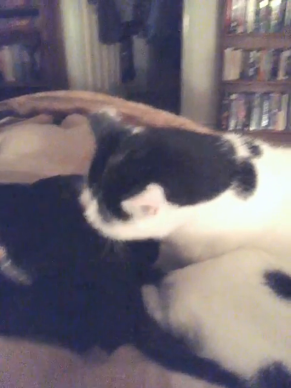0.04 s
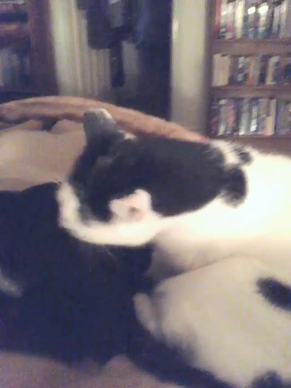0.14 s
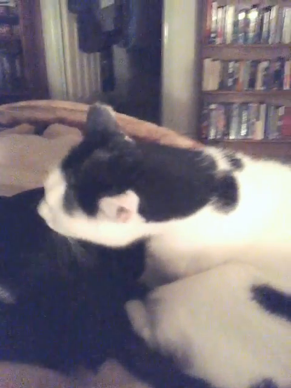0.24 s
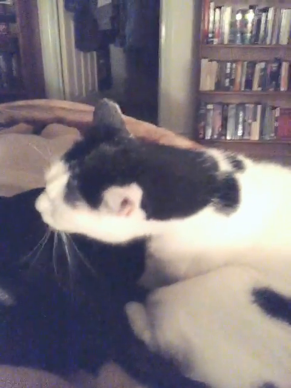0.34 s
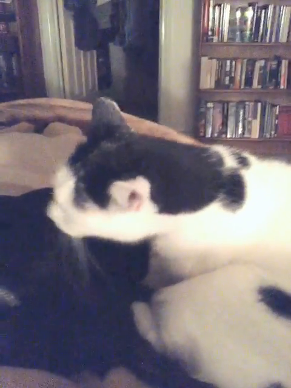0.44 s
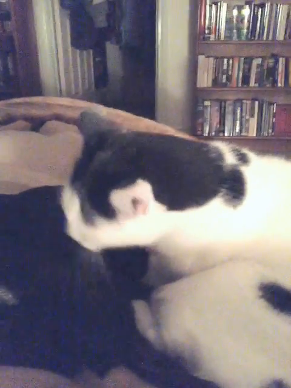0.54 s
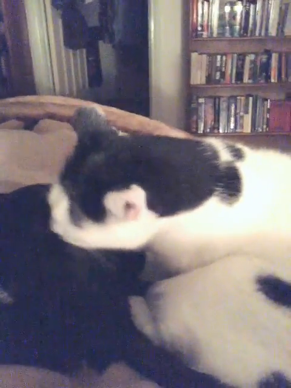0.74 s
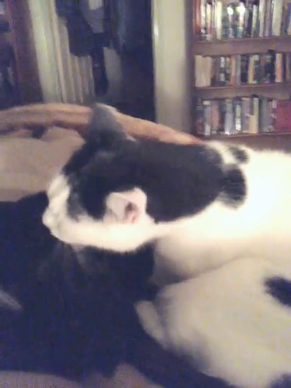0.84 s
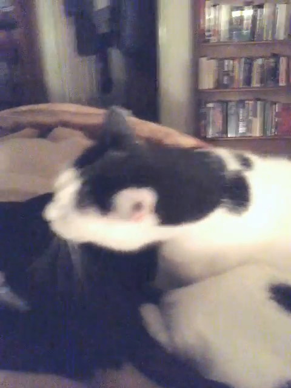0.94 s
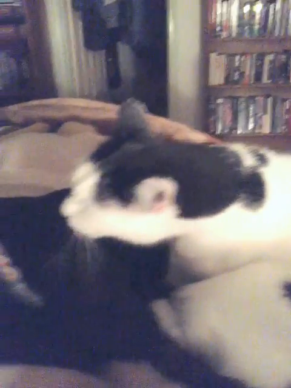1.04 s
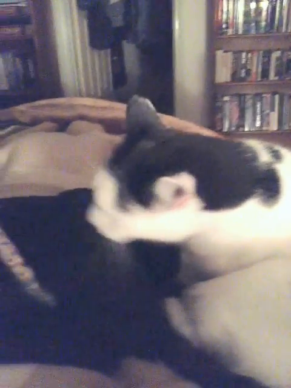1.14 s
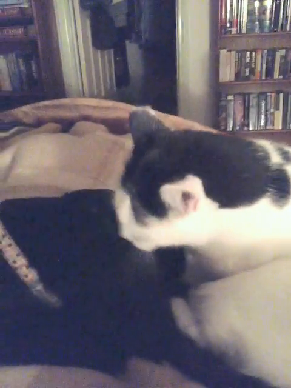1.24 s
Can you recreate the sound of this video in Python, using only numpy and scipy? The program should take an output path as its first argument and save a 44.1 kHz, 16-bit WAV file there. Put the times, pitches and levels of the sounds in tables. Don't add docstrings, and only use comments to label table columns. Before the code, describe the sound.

Handling noise on a hand-held phone, close and dry, in a quiet room with a cat on a couch. Soft dull bumps at 0-0.07 and 0.17-0.2 seconds; sharp clicks at 0.23 and, loudest, 0.37; a click and heavy juddering knock around 0.44; clicks at 0.49 and 0.56. Muffled bumps and faint ticks follow from 0.68, with strong thuds near 1.2. Low rumble and faint hiss throughout.

```python
import sys
import numpy as np
from scipy import signal
from scipy.fft import rfft, irfft
from scipy.io import wavfile
from scipy.ndimage import uniform_filter1d

SR = 44100
rng = np.random.default_rng(int(sys.argv[2]) if len(sys.argv) > 2 else 0)


def master(y):
    cut = np.clip(np.atleast_2d(y).T, -1, 1)
    pcm = np.round(cut * 32767)
    wavfile.write(sys.argv[1], SR, pcm.astype(np.int16))


def invert_db(level):
    return 10 ** (np.asarray(level, dtype=float) / 20)


N = 57330

# start in seconds, step level in dB, direction (+1 or -1), rise time in ms.
SHOVE_STEPS = [(.012, -46, 1, .9), (.0334, -32.4, -1, 1.9), (.05, -46, 1, .7), (.0652, -31, 1, 1.67),
               (.1661, -33.4, 1, 2), (.1814, -26, -1, 1.96), (.2027, -31.3, 1, 1.73),
               (.6784, -32.4, -1, 1.46), (.7451, -33, -1, 1.52), (.7602, -34.5, -1, 1.35),
               (.7748, -31.8, 1, 1.76), (.8478, -33, -1, 1.39), (.9308, -49, 1, .52), (.94, -51, -1, .6),
               (.9468, -50, 1, .7), (.9492, -50, -1, .7), (1.1728, -26.3, 1, 1.8), (1.1933, -25.5, 1, 1.66),
               (1.2152, -31.2, 1, 1.6), (.411, -42, 1, 1.1), (.467, -40, 1, 1.1), (.833, -42, -1, 1.1),
               (.872, -44, 1, 1.1), (.985, -47, 1, .8), (1.0391, -43, 1, .96), (1.057, -46, -1, .7)]

# start in seconds, step level in dB, direction (+1 or -1), rise time in ms,
# slow creep after the step as a share of it (negative sags back).
SLIP_STEPS = [(.23116, -27.2, 1, .034, .5), (.23183, -22.3, 1, .003, -.13), (.36987, -15, 1, .003, -.06),
              (.43636, -22.4, 1, .003, -.08), (.48814, -24, 1, .003, .07), (.56342, -27, 1, .003, -.1),
              (.68173, -38, 1, .008, .17), (.8164, -43.2, 1, .14, .15), (.81802, -45.5, 1, .003, .2),
              (.86958, -53.5, 1, .01, -.3), (1.01581, -32.8, -1, .035, .68), (1.06864, -47, 1, .008, .6),
              (1.0584, -53, -1, .01, .1), (1.07449, -35.9, 1, .003, .29), (1.10063, -48, 1, .02, -.5),
              (1.24445, -45, 1, .012, -.4), (1.26403, -49, 1, .03, -.31)]

# start in seconds, step level in dB, direction (+1 or -1), rise time in ms.
JUDDER_STEPS = [
    (.2329, -25.8, -1, 1.07),
    (.4373, -30.5, -1, .52),
    (.4426, -14.6, 1, 1.24),
    (.4442, -18.3, -1, .67),
    (.4445, -20.1, 1, .4),
    (.4488, -31.7, 1, .32),
    (.4508, -19.4, 1, .81),
    (.4511, -28.9, -1, .37),
    (.4566, -36.7, 1, 1.2),
    (1.0762, -39.5, -1, .76),
]

# corner frequency in Hz, resonance as Q (no unit).
LOW_CUT_STAGES = [(185.4, 1.124), (110.3, .868)]

# frequency in Hz, level in dB.
PORT_COLOUR = [(450, 0), (5000, -3.3), (7300, -5.8), (9750, -14.5), (12300, -5.2), (14200, -2.6),
               (15300, -2.4), (16300, -4)]

HZ = np.fft.rfftfreq(N, 1 / SR)
S = 2j * np.pi * HZ


def noise(gain):
    return irfft(rfft(rng.standard_normal(N)) * gain, N)


def pressure_steps(rows):
    creep_s = 0.0007
    slope = 0
    for start_s, db, direction, rise_ms, *creep in rows:
        delay = S * start_s
        rounding = (2 * np.pi * HZ * rise_ms / 1000) ** 2 / 2
        edge = np.exp(-delay - rounding)
        creeping = 1 + sum(creep) / (1 + S * creep_s)
        slope = slope + np.sign(direction) * invert_db(db) * edge * creeping
    return np.cumsum(irfft(slope, N))


def rumble():
    lump_db, lump_hz, flicker_db, flicker_per_s = -48, 188, 2.5, 60
    sway_db, sway_hz = -8.5, 26.4
    hold = int(SR / flicker_per_s)
    levels = np.repeat(rng.standard_normal(N // hold + 1), hold)[:N]
    flicker = invert_db(flicker_db * uniform_filter1d(levels, hold))
    lumps = invert_db(lump_db) * noise(1 / (1 + S / (2 * np.pi * lump_hz)) ** 2)
    sway = invert_db(sway_db) * noise(1 / (1 + S / (2 * np.pi * sway_hz)) ** 3)
    return flicker * lumps + sway


def hiss():
    level_db, low_boost_db, tilt_hz, top_hz = -67.5, 4.5, 1400, 15850
    top_cut = 1 / (1 + (HZ / top_hz) ** 150)
    low_boost = 1 + (invert_db(low_boost_db) - 1) / (1 + S / (2 * np.pi * tilt_hz))
    return invert_db(level_db) * noise(top_cut * low_boost)


def circuit_noise():
    level_db, centre_hz = -57, 55.7
    w = 2 * np.pi * centre_hz
    band = S * w / (S * S + S * w + w * w)
    return invert_db(level_db) * noise(band ** 2 * np.abs(band) ** 2)


def shoves():
    return pressure_steps(SHOVE_STEPS)


def slips():
    return pressure_steps(SLIP_STEPS)


def judder():
    return pressure_steps(JUDDER_STEPS)


def scene():
    return (rumble() + hiss() + shoves() + slips() + judder())[None]


def microphone_response():
    vent_hz, top_hz = 196.6, 16420
    gain = S / (S + 2 * np.pi * vent_hz) / (1 + (HZ / top_hz) ** 100)
    for hz, q in LOW_CUT_STAGES:
        w = 2 * np.pi * hz
        gain = gain * S * S / (S * S + S * w / q + w * w)
    port_hz, port_db = np.transpose(PORT_COLOUR)
    colour_db = np.interp(np.log(HZ + 1), np.log(port_hz), port_db)
    return gain * invert_db(uniform_filter1d(colour_db, size=600))


def low_pass(x):
    return signal.sosfilt(signal.butter(12, 16990, fs=SR, output="sos"), x)


def record(dry):
    level = dry - np.linspace(dry[:, 0], dry[:, -1], N).T
    heard = irfft(rfft(level) * microphone_response(), N)
    return low_pass(heard + circuit_noise())


dry = scene()
out = record(dry)
master(out)
```